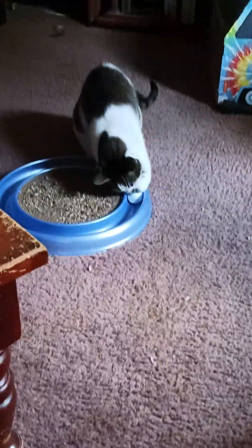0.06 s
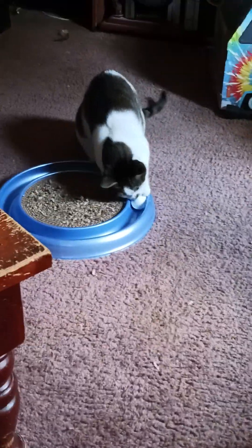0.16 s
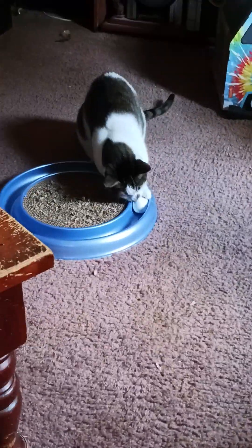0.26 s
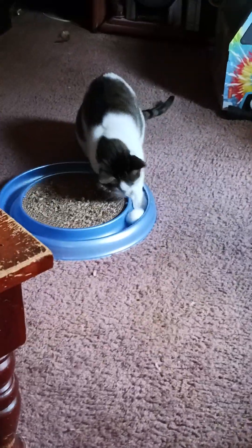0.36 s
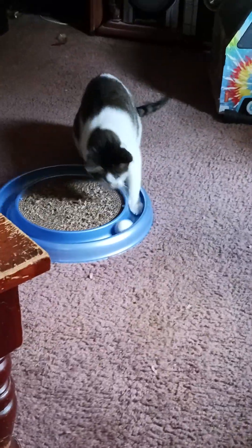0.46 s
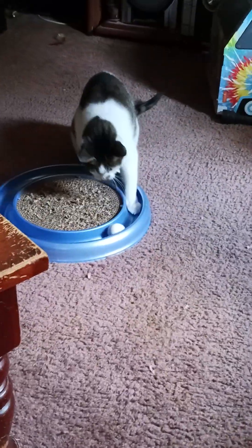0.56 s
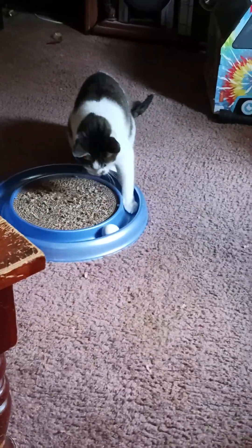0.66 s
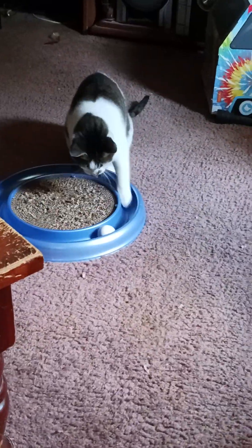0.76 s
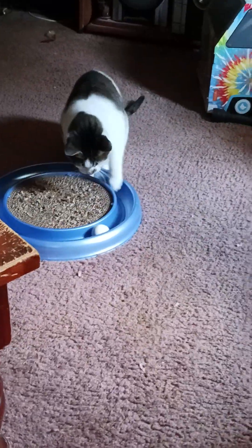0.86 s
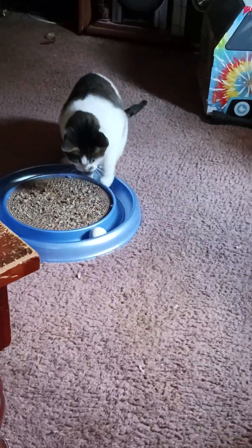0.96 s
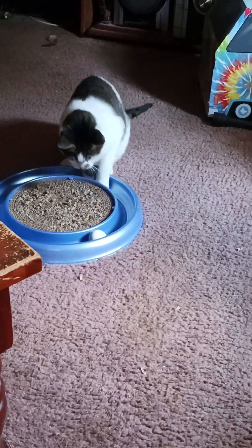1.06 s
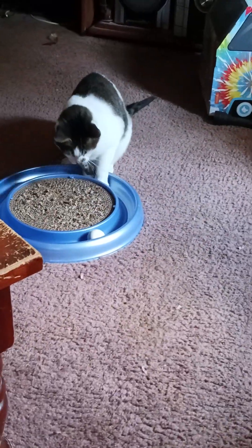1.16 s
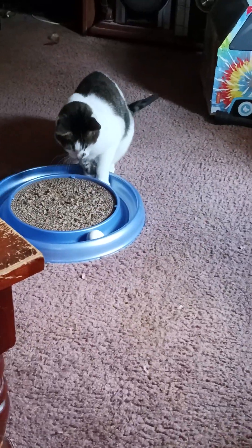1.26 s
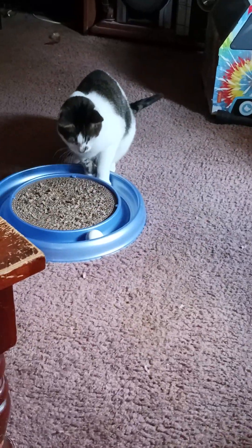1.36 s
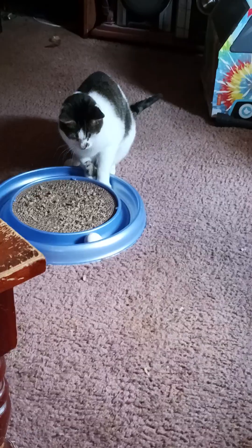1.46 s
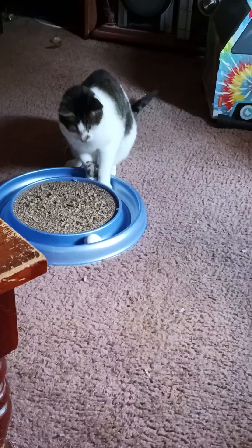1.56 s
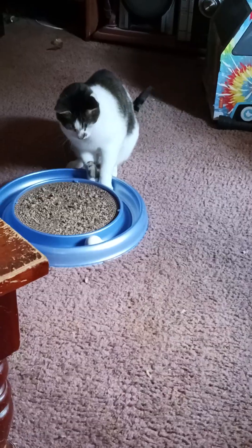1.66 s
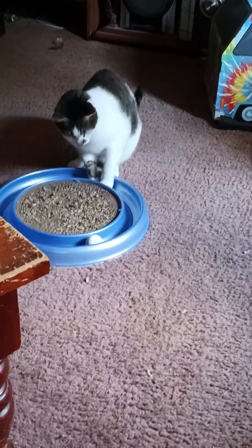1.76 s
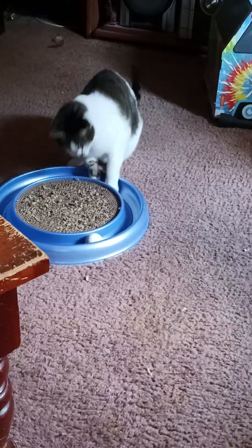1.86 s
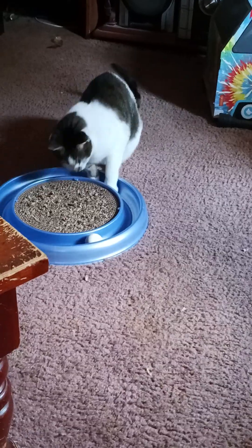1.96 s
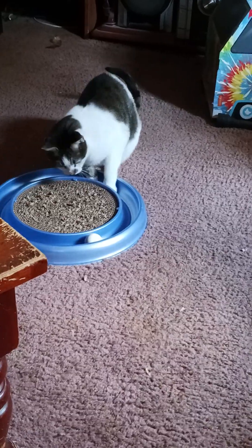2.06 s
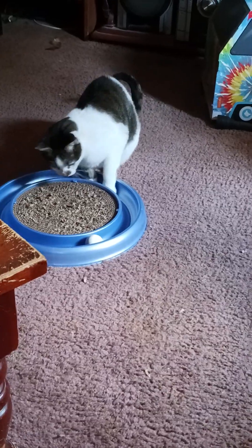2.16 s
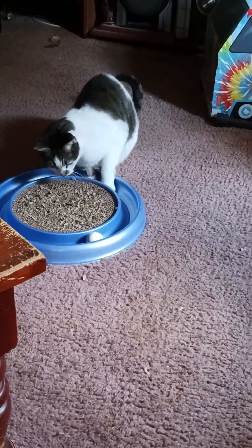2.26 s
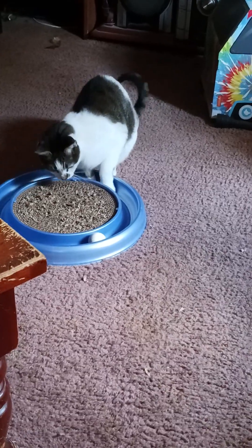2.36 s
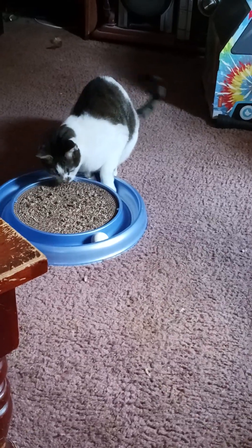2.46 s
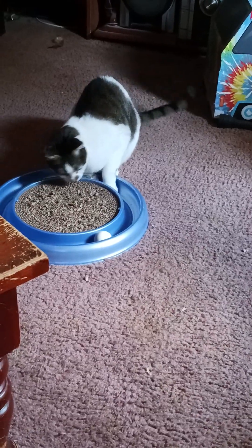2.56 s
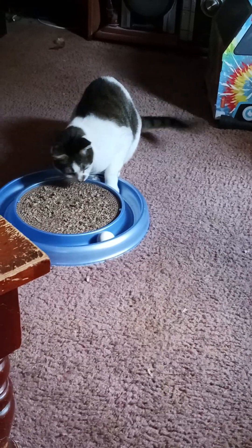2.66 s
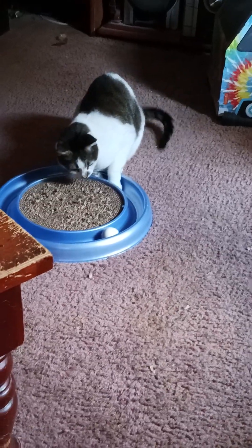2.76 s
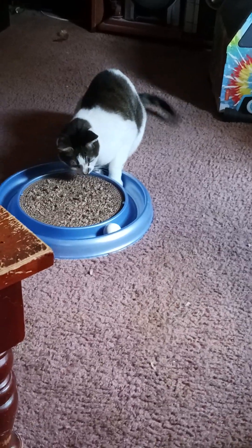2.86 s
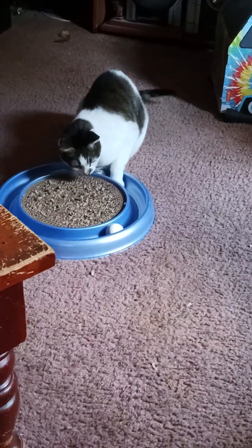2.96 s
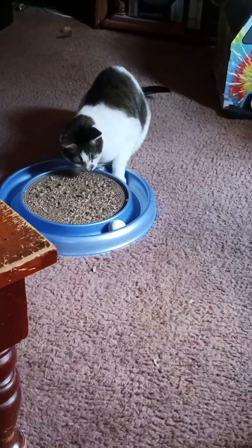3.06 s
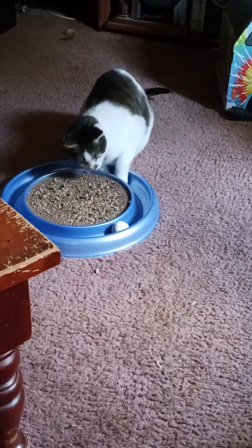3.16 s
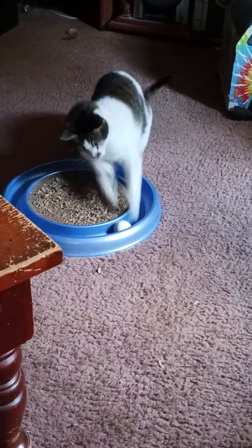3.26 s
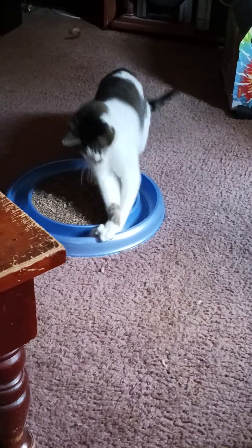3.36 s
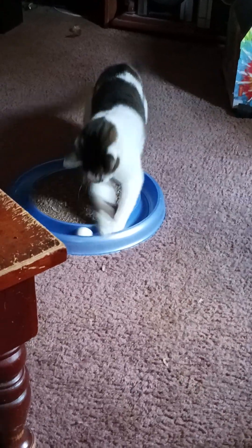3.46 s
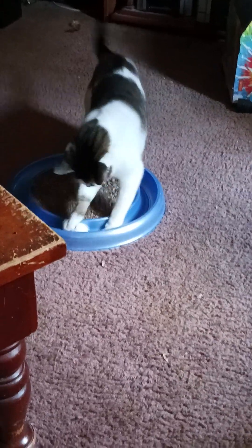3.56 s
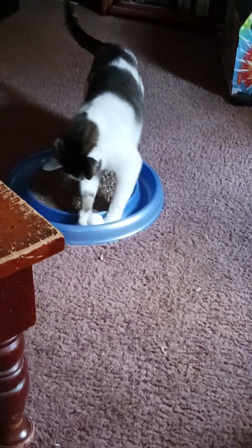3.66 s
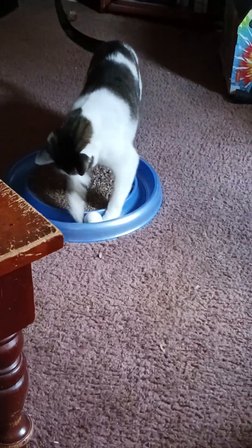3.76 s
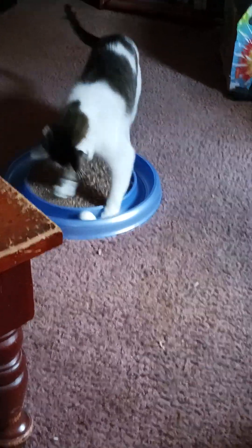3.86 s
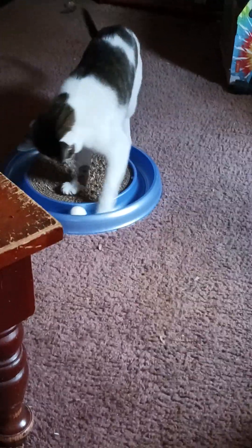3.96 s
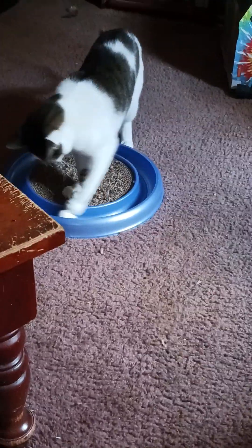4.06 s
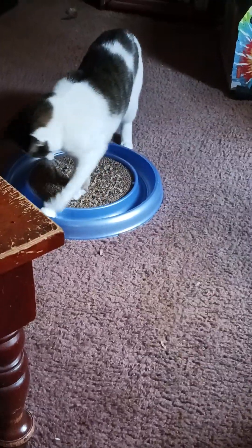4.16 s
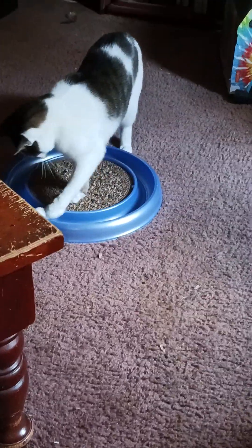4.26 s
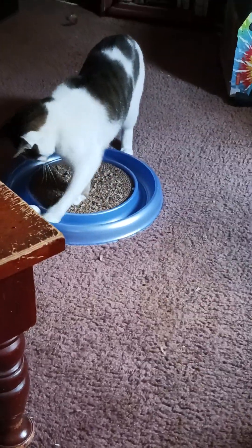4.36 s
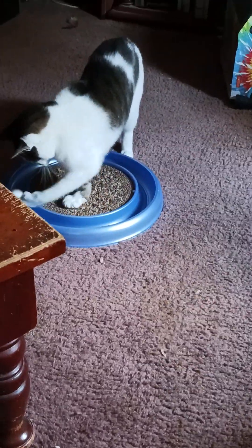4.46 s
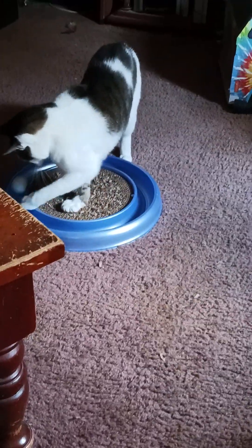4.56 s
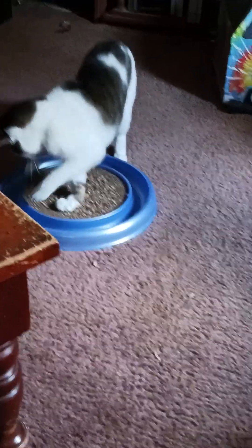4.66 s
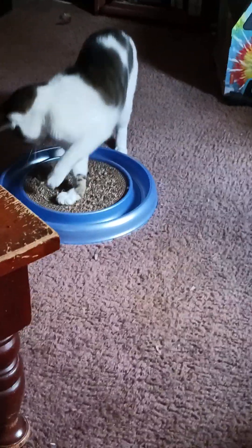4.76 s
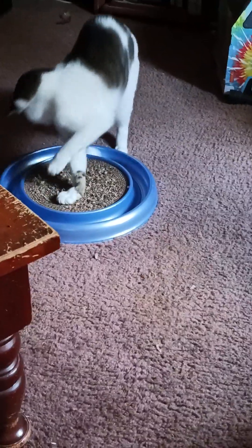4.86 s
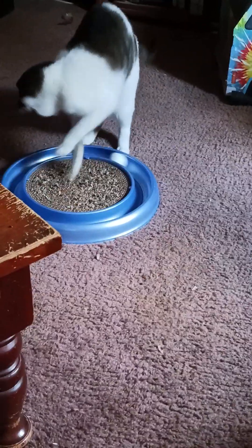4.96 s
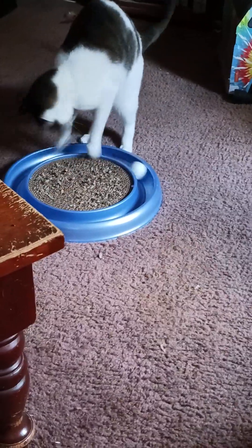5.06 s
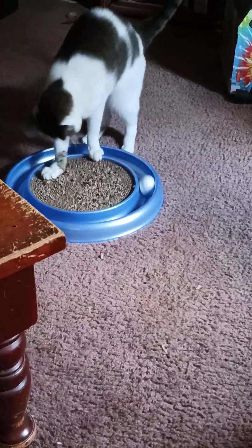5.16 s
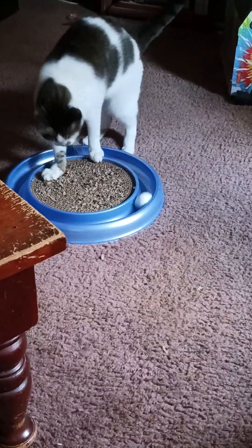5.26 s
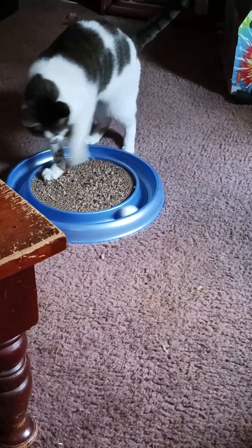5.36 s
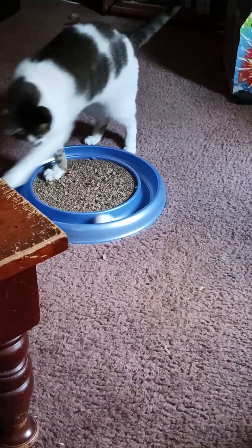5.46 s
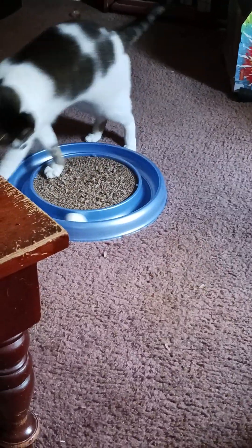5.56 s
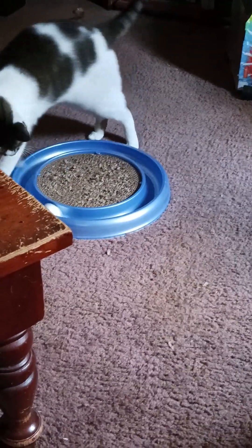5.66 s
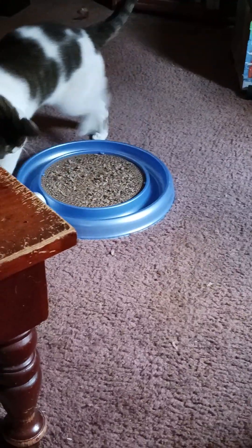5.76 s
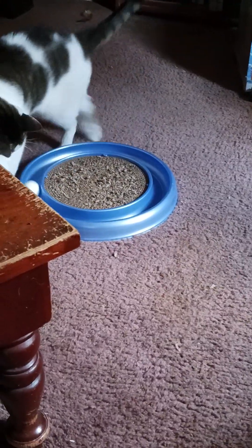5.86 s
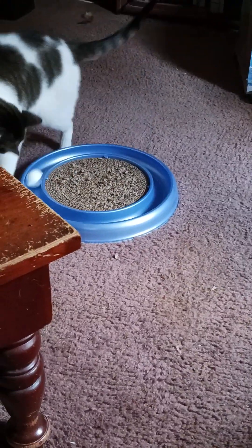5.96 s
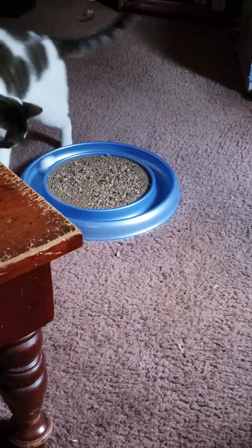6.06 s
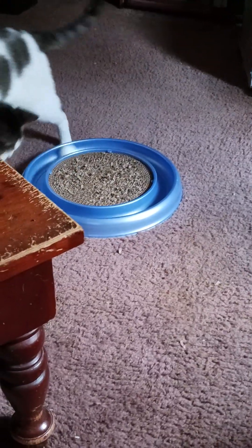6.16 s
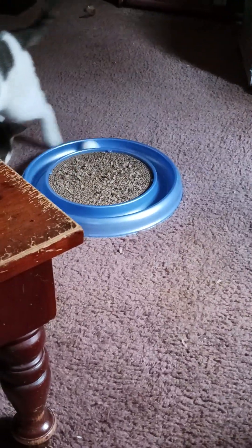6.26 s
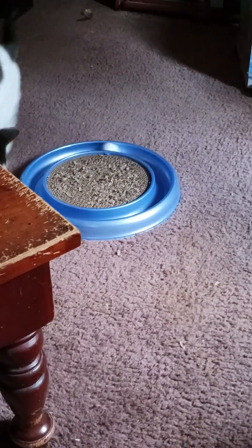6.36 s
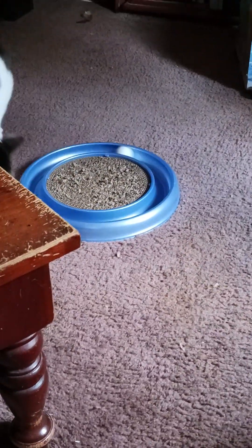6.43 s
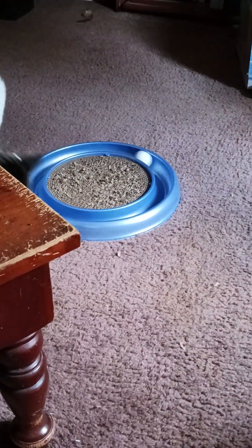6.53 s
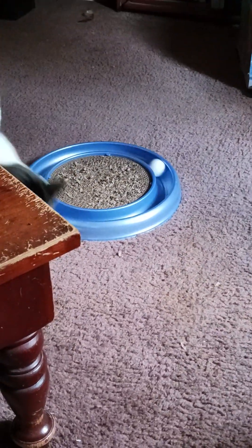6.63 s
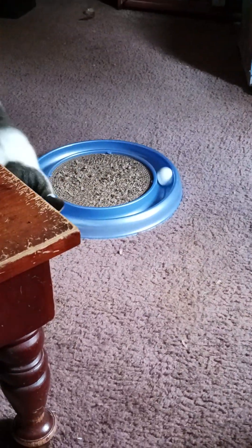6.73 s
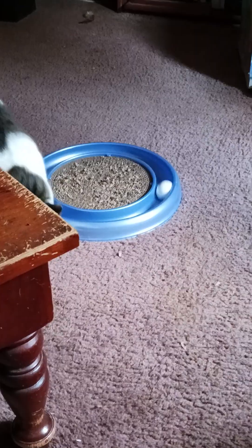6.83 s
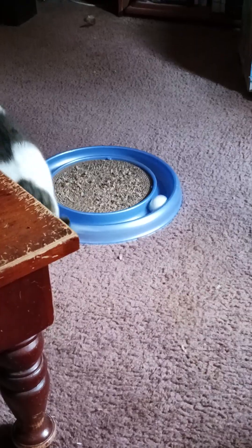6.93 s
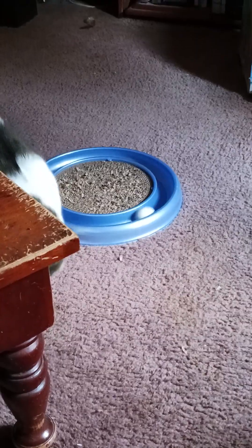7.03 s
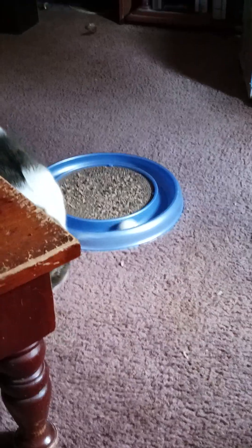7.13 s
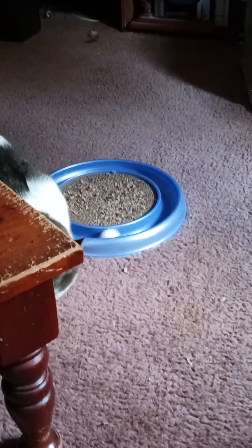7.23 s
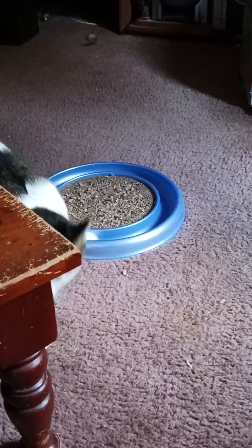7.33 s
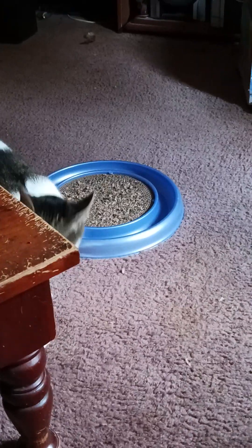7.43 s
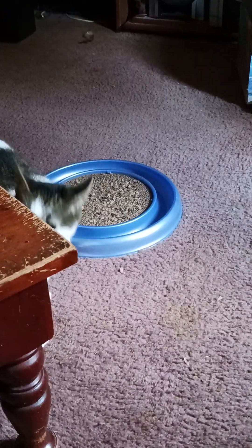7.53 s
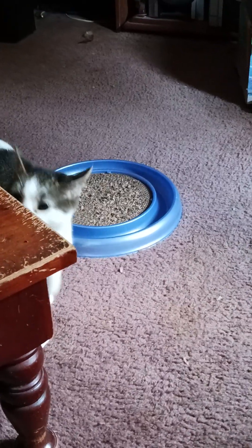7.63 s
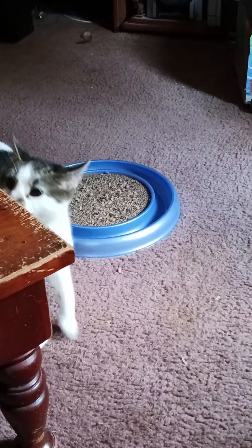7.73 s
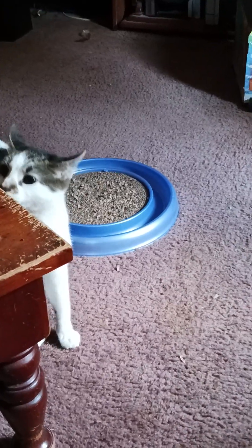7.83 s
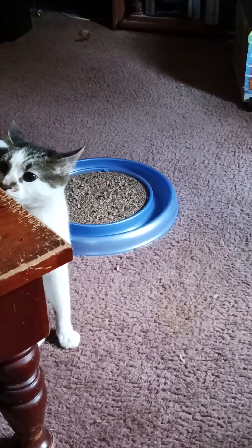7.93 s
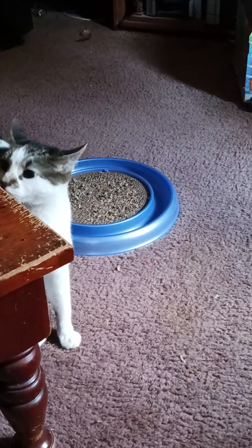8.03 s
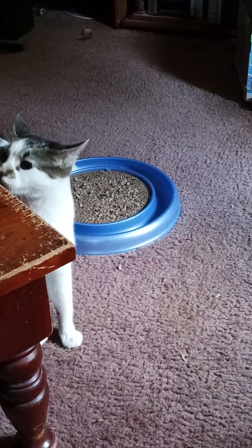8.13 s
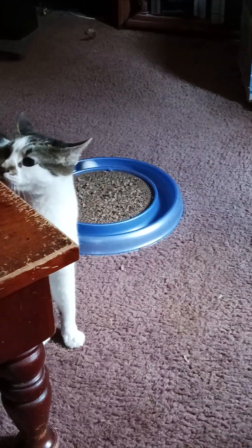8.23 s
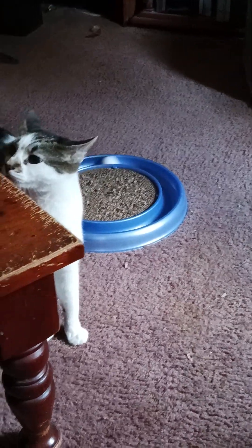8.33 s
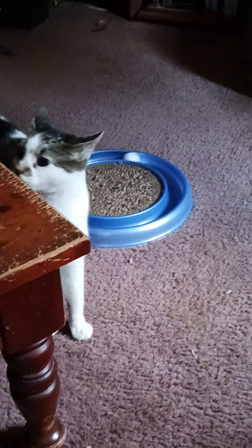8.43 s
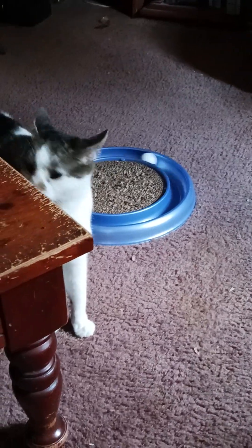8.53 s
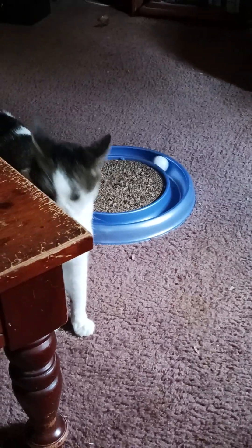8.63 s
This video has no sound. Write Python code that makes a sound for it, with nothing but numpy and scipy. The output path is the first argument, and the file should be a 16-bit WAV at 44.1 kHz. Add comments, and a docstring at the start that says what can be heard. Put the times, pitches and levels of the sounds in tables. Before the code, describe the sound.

A short rasp and a few plastic knocks open, with a little rolling, then room hush and soft hand rumble. Past three seconds come a flurry of slaps, clacks and low bumps, then a hollow rolling ball circles the plastic track, rocking and knocking unevenly as it slows. Thin bright claw clicks dot the roll. Small furnished room, short tail, heard by a handheld stereo phone nearby.

```python
"""Cat batting a ball round a track toy

Paws scrape the cardboard pad and jolt the shell, claws tick, and the ball knocks on its plastic track wall.
Strikes and bumps excite a resonant shell, heard through echoes and a short tail. After a good push the ball
rumbles round, fading and swelling slightly once a lap. Slaps land on the rim and thuds boom in the floor.
A hand shifting on the phone rumbles softly, mostly at the left microphone, over quiet room noise and hum.
"""
import sys
import numpy as np
from scipy import signal
from scipy.fft import rfft, irfft, next_fast_len
from scipy.io import wavfile
from scipy.ndimage import uniform_filter1d

SR = 44100
rng = np.random.default_rng(int(sys.argv[2]) if len(sys.argv) > 2 else 0)


def int16_out(signal):
    """Quantize to a 16-bit WAV file."""
    q = np.round(np.clip(np.atleast_2d(signal).T, -1, 1) * 32767)
    wavfile.write(sys.argv[1], SR, q.astype(np.int16))


N = 383229
SIZE = 8192  # response length, samples
HZ = np.fft.rfftfreq(SIZE, 1 / SR)
TIME = np.arange(N) / SR

# drive of the shell by soft rolling or sliding contact: (frequency [Hz], level [dB])
CONTACT_DRIVE = [(100, 2), (170, 5), (260, 4), (340, -1), (480, -0.5), (700, -2), (1000, -5), (1400, -2.5),
                 (2000, -3), (3000, -9), (4500, -8), (6000, -22), (15000, -25)]
# likeness of diffuse sound at the two microphone ports: (frequency [Hz], coherence [-])
PORT_COHERENCE = [(40, 0.8), (130, 0.91), (290, 0.66), (640, 0.077), (1200, 0), (16000, 0)]


def amp(db):
    """Decibels to gain."""
    return 10 ** (np.asarray(db) / 20)


def unit(x):
    """Scales to an rms of one."""
    return x / np.sqrt(np.mean(x ** 2) + 1e-20)


def unit_onset(response):
    """Scales a response to an rms of one over its first 25 ms."""
    return response / np.sqrt(np.mean(response[:, :SR // 40] ** 2))


def read(points, hz):
    """Interpolates a table on a log-frequency axis."""
    table_hz, value = np.transpose(points)
    return np.interp(np.log(hz + 1), np.log(table_hz), value)


def add(mix, start_s, sound):
    """Adds a sound to the mix from start_s, cut at the end of the mix."""
    part = mix[:, max(round(start_s * SR), 0):][:, :sound.shape[-1]]
    part += sound[..., :part.shape[-1]]


def through(x, response):
    """Convolves, keeping the length of x."""
    return signal.oaconvolve(np.atleast_2d(x), np.atleast_2d(response), axes=1)[:, :x.shape[-1]]


def bump(hz, width_hz):
    """The bell of one resonance, height one."""
    return 1 / (1 + (2 * (HZ - hz) / width_hz) ** 2)


def ring(db):
    """Minimum-phase impulse response with this spectrum: the cepstrum is folded to be causal."""
    floored_db = np.maximum(db, db.max() - 100)
    cepstrum = irfft(np.log(amp(floored_db)))
    cepstrum[1:SIZE // 2] *= 2
    cepstrum[SIZE // 2 + 1:] = 0
    return irfft(np.exp(rfft(cepstrum)))


def smooth_noise(window_s):
    """Random fluctuation slower than the window, rms one."""
    return unit(uniform_filter1d(rng.standard_normal(N), max(int(window_s * SR), 2)))


def grains(per_s, spread_db):
    """Random small impacts of uneven size and either sign."""
    hit = rng.random(N) < per_s / SR
    size = np.minimum(rng.exponential(1, N), 4)
    sign = rng.choice([-1, 1], N)
    return unit(hit * sign * amp(spread_db * size))


def diffuse(size):
    """White noise from all sides: the ports share it at low frequencies and differ in the treble."""
    left, other = rfft(rng.standard_normal((2, size)))
    same = np.clip(read(PORT_COHERENCE, np.fft.rfftfreq(size, 1 / SR)), -1, 1)
    right = same * left + np.sqrt(1 - same ** 2) * other
    return irfft(np.array([left, right]), size)


def room(tail_db):
    """Paths from one spot on the toy: direct sound, a few echoes and a diffuse decaying tail."""
    # nearby furniture and walls: (delay [s], level [dB])
    echo_paths = [(.0026, -11), (.0083, -8), (0.0123, -14.5), (.0201, -14.5)]
    # decay of the tail: (frequency [Hz], time to fall 60 dB [s])
    tail_t60 = [(150, 0.47), (500, 0.31), (1400, 0.3), (3700, .27), (10000, 0.2)]
    left_lead_s, echo_jitter_s, build_s = .00007, .000306, .0064

    def delay(left_s, right_s):
        return np.exp(-2j * np.pi * HZ * np.array([[left_s], [right_s]]))

    start_s = 8 / SR
    paths = delay(start_s, start_s + left_lead_s)
    for delay_s, db in echo_paths:
        paths = paths + amp(db) * delay(*(delay_s + echo_jitter_s * rng.uniform(-1, 1, 2)))
    hz, t, spectra = signal.stft(diffuse(SIZE), SR, nperseg=256)
    decay = amp(-60 * t / read(tail_t60, hz)[:, None])
    build = 1 - np.exp(-t / build_s)
    tail = signal.istft(spectra * decay * build)[1][:, :SIZE]
    return irfft(paths) + amp(tail_db) * unit(tail) / np.sqrt(SIZE)


def shell_db(shift=1):
    """Spectrum of the plastic shell: a broad shape plus resonances, whose pitches scale with shift."""
    # broad shape: (frequency [Hz], level [dB])
    broad_shape = [(60, -20), (140, -8), (210, -8), (300, 0), (500, -2), (680, -0.5), (950, -10),
                   (1300, -3), (1950, -6), (2800, -16), (4600, -16), (8000, -15.5), (13000, -21.5),
                   (16000, -29)]
    # resonances: (frequency [Hz], width [Hz], height above the shape [dB])
    modes = [(258, 26, 9), (338.2, 26, 8), (435, 29, 4), (620, 50, 3), (745, 70, 4), (1200, 70, 3.5),
             (1352, 35, 6), (1627, 56, 3), (1808, 35, 8), (1968, 25, 6), (2164, 30, 4), (2895, 30, 5),
             (3480, 30, 7), (4650, 440, 3)]
    return read(broad_shape, HZ) + sum(db * bump(hz * shift, width) for hz, width, db in modes)


def radiate(db, tail_db):
    """The shell heard across the room; bending waves carry the treble faster than the bass."""
    # tilt of the toy between the ports: (frequency [Hz], left over right [dB])
    side_balance = [(100, 0), (240, -1), (350, -4), (700, 1), (1300, -1.5), (2500, 0), (4500, -3),
                    (8000, 2), (15000, 4)]
    lag_s = .0007 / np.sqrt(1 + HZ / 1500)
    dispersion = np.exp(-2j * np.pi * np.cumsum(lag_s) * HZ[1])
    sides = amp(np.array([[.5], [-.5]]) * read(side_balance, HZ))
    return through(room(tail_db), irfft(rfft(ring(db)) * dispersion * sides))


def hush():
    """Still room: noise shaped at each port, plus a faint steady appliance hum."""
    # room noise: (frequency [Hz], relative level [dB])
    noise_tone = [(15, -54), (25, -23), (59, -2.5), (92, -6.5), (123, 2.5), (161, -8.5), (249, -2.5),
                  (285, -12.5), (405, -11.5), (463, -24.5), (641, -15), (1160, -22), (1740, -18),
                  (2410, -30.5), (16000, -34.5)]
    # tilt of the noise between the ports: (frequency [Hz], left over right [dB])
    noise_balance = [(60, 0), (110, -2.5), (200, 2.5), (380, 1.5), (700, 0), (1290, 3.0), (2380, 5.5),
                     (4400, 1), (8120, 4), (15000, 13)]
    noise_db, hum_hz, hum_peak_db = -65, 119.5, -75
    apart_db = 10 * np.log10(2 / (1 + np.clip(read(PORT_COHERENCE, HZ), 0, 1)))
    sides_db = np.array([[.5], [-.5]]) * read(noise_balance, HZ)
    port_filters = np.array([ring(db) for db in read(noise_tone, HZ) + apart_db + sides_db])
    noise = unit(through(diffuse(next_fast_len(N))[:, :N], port_filters))
    return amp(noise_db) * noise + amp(hum_peak_db) * np.sin(2 * np.pi * hum_hz * TIME)


def laps():
    """Laps run since the far side of the track, at a speed that dies away exponentially."""
    far_side_s, lap_s, slowing_s = 4.87, 1.3, 6  # a pass of the far side, lap time there, time constant
    return slowing_s / lap_s * (1 - np.exp(-(TIME - far_side_s) / slowing_s))


def rolling():
    """Tiny bumps under the ball drive the shell; tone and paths change as it circles, friction fades it."""
    # push to stop by a paw: (start [s], end [s], relative rumble [dB], relative rattle [dB])
    rolls = [(0, .58, -65.5, -72), (3.9, 4.45, -66, -74), (4.45, 8.8, -56, -65.6)]
    spin_up_s, stop_s = .1, .06
    rumble_loss_db_per_s, rattle_loss_db_per_s = 1.5, 2.3
    rumble_trim_db, rattle_trim_db = 1.4, 1.5
    rumble_swell_db, rattle_swell_db = .3, .9  # at the far side of each lap
    rock_period_s, rock_touch_s, rock_db = .272, 6.9, 2.3  # from wall to wall of the groove
    turn, rumble, rattle, heard = laps(), 0, 0, 0
    for start_s, end_s, low_db, high_db in rolls:
        age_s = np.maximum(TIME - start_s, 0)
        moving = (1 - np.exp(-age_s / spin_up_s)) * np.exp(-np.maximum(TIME - end_s, 0) / stop_s)
        rumble = rumble + moving * amp(low_db - rumble_loss_db_per_s * age_s)
        rattle = rattle + moving * amp(high_db - rattle_loss_db_per_s * age_s)
    wobble_db = 2.3 * smooth_noise(.06)
    rocking_db = rock_db * np.cos(2 * np.pi * (TIME - rock_touch_s) / rock_period_s)
    bumps = grains(per_s=340, spread_db=3.8) * amp(wobble_db + rocking_db)
    for spot in (.25, .75):  # crossfade between two spots on the track
        near = abs(np.cos(np.pi * (turn - spot)))
        colour_db = shell_db(1 + .025 * np.sin(2 * np.pi * spot)) + read(CONTACT_DRIVE, HZ)
        heard = heard + through(bumps * near, radiate(colour_db, tail_db=2))
    low = signal.sosfiltfilt(signal.butter(4, 950, fs=SR, output="sos"), heard)
    far = np.cos(2 * np.pi * turn)
    rumble_gain = rumble * amp(rumble_trim_db + rumble_swell_db * far)
    rattle_gain = rattle * amp(rattle_trim_db + rattle_swell_db * far)
    return rumble_gain * unit(low) + rattle_gain * unit(heard - low)


def strikes(rows, reach, tail_db, ping_hz, ping_width_hz):
    """Each strike rings the shell; the harder the contact, the more of the upper bands it reaches."""
    # edges between body, clack, crack and fizz: [Hz]
    band_edges_hz = [900, 2600, 7500]
    pitch_wander, hollow_db, hollow_width_hz = .004, 4, 260
    firm_db, soft_range_db = -43, 6
    softer_db = np.array((-2, -1.5, 0, 0))  # per band, for the lightest touch
    wetter_db, drier_db_per_db = 3.5, 1.6
    out = np.zeros((2, N))
    band = np.searchsorted(band_edges_hz, HZ)
    base_db, slope = np.transpose(reach)
    for start_s, db, hardness_db, hollow_hz, ping_db in rows:
        shape_db = shell_db(1 + pitch_wander * rng.standard_normal())
        shape_db += hollow_db * bump(hollow_hz, hollow_width_hz) + ping_db * bump(ping_hz, ping_width_hz)
        # light touches are softer and heard more by way of the room; the very hardest are dry
        light = np.clip((firm_db - db) / soft_range_db, 0, 1)
        wet_db = tail_db + wetter_db * light - drier_db_per_db * max(hardness_db, 0)
        power = amp(db + base_db + slope * hardness_db + light * softer_db) ** 2
        strength_db = 10 * np.log10(power / np.bincount(band, amp(shape_db) ** 2))
        drive_db = read(list(zip((650, 1400, 4500, 10000), strength_db)), HZ)
        add(out, start_s, np.sqrt(power.sum()) * unit_onset(radiate(shape_db + drive_db, wet_db)))
    return out


def knocks():
    """The ball hits the track wall and rings the shell; once, a dragging paw jolts the shell instead."""
    # ball on the track wall, but at 0.4054 s a paw drags the toy and jolts its shell:
    # (time [s], relative level [dB], hardness as treble over body [dB], hollow pitch of the spot [Hz],
    #  ping of the rim [dB])
    shell_hits = [(0.0352, -49, -19, 440, 0), (0.2346, -62, -3, 580, 5), (0.4054, -49, -12, 440, 10),
                  (0.6266, -69, -5, 480, 1), (3.3841, -45.5, -3, 500, 9), (3.872, -41.5, -12.5, 430, 3),
                  (4.3126, -63, -8, 270, 4), (4.4423, -55, -15, 280, 0), (4.5055, -45.5, -20, 330, 2),
                  (4.6209, -55, -17, 400, 3), (4.7732, -47, -24, 460, 6), (4.8808, -48.5, -27, 420, 8),
                  (4.9075, -38.5, -17.5, 520, 0), (4.9698, -58, -11, 470, 3), (5.0178, -52, -24, 420, 0),
                  (5.1835, -48, -18, 360, 1), (5.2515, -50, -9.5, 340, 0), (5.3929, -49, -23, 530, 0),
                  (5.5107, -50, -26, 390, 4), (5.7814, -53, -16, 390, 0), (5.8394, -63, -5, 320, 10),
                  (5.9218, -48.5, -19, 520, 5), (6.1239, -53, -18, 440, 1), (6.2539, -51, -27, 460, 1),
                  (6.4036, -41.5, -15, 620, 13), (6.4532, -52, -22, 510, 5), (6.5648, -52, -22, 440, 1),
                  (6.6905, -53, -21, 460, 1), (7.4258, -50, -28, 510, 2), (7.7999, -54, -18, 490, 0),
                  (7.8124, -48, -20, 380, 0), (8.4086, -44.5, -16.5, 510, 3)]
    # body, clack, crack, fizz: (level at hardness zero [dB], gain per hardness [dB/dB])
    band_reach = [(0, 0), (-1, .35), (-1.5, .98), (-6, .72)]
    return strikes(shell_hits, band_reach, tail_db=-2.3, ping_hz=4550, ping_width_hz=1100)


def held(start_s, end_s, rise_s, fall_s):
    """Swells up to the start, holds, and dies away after the end."""
    return np.exp(np.minimum(TIME - start_s, 0) / rise_s - np.maximum(TIME - end_s, 0) / fall_s)


def grip():
    """Slow lumpy pressure of the hand on the phone, mostly in the left port."""
    # shifts of the hand: (start [s], length [s], relative level [dB])
    hand_shifts = [(.04, .1, -51), (.28, .14, -51), (.74, .27, -55), (1.36, .06, -62), (1.61, .11, -51),
                   (1.8, .04, -57), (2.87, .04, -52), (2.98, .15, -60), (3.29, .04, -46), (3.375, .04, -37),
                   (3.53, .22, -50), (3.92, .32, -52.5), (4.32, .14, -43.5), (4.79, .2, -46),
                   (5.14, .17, -41.5), (5.43, .23, -52), (5.7, .04, -47), (6.86, .18, -61),
                   (7.63, .06, -46), (7.94, .39, -58), (8.655, .05, -44.5)]
    # tone of the pressure noise: (frequency [Hz], level [dB])
    pressure_tone = [(15, -35), (25, -21), (40, -1), (60, 0.5), (85, -3), (120, -13), (170, -21),
                     (250, -29), (480, -60), (2000, -90)]
    holding_db = -75  # faint pressure between shifts, before the port gains
    left_db, right_db, evenness = 5, -17, .59
    power = amp(holding_db) ** 2
    for start_s, length_s, db in hand_shifts:
        power = power + (amp(db) * held(start_s, start_s + length_s, rise_s=.014, fall_s=.036)) ** 2
    lumps = through(rng.standard_normal((2, N)), ring(read(pressure_tone, HZ)))
    envelope = abs(uniform_filter1d(abs(lumps), size=1800))
    lumps = unit(lumps / envelope ** evenness)
    return amp([[left_db], [right_db]]) * lumps * np.sqrt(power)


def ticks():
    """Claws catch: thin bright clicks in the room, and one dry tick right at the right port."""
    # claws catch: (time [s], level [dB])
    catches = [(0.1995, -75), (4.8207, -74), (5.1235, -64), (5.6309, -72), (6.222, -67), (6.643, -74),
               (6.9422, -67), (7.3585, -77), (7.7837, -65), (8.2531, -67.5), (8.5131, -71)]
    # spectrum of a claw: (frequency [Hz], level [dB])
    claw_tone = [(500, -30), (3000, -16), (6000, -4), (9000, 1), (13000, -2), (16000, -5.5)]
    near_s, near_left_db, near_right_db = 3.8082, -68, -57
    out, claw = np.zeros((2, N)), ring(read(claw_tone, HZ))
    for start_s, db in catches:
        add(out, start_s, amp(db) * unit_onset(through(room(tail_db=0), claw)))
    near = ring(read([(1500, -35), (3800, -6), (4800, -10), (6000, 2), (10000, -13), (16000, -13)], HZ))
    add(out, near_s, amp([[near_left_db], [near_right_db]]) * unit_onset(near[None]))
    return out


def scrapes():
    """Fibres snap in clumps and slips shake the shell under paws and body; one stroke is a swell of rolling."""
    # paws and body drag, but at 4.17 s the rolling ball's rumble in the shell swells briefly:
    # (time of the height [s], fall by 20 dB [s], relative fibre rasp [dB], relative shell groan [dB])
    strokes = [(.342, .05, -43.5, -63), (.385, .08, -60, -51), (.422, .08, -53, -52),
               (.517, .04, -50.5, -63), (3.355, .1, -64, -68), (3.39, .19, -53, -55), (3.66, .03, -66, -65),
               (4.17, .06, -82, -59), (4.5, .3, -61, -54.5), (4.83, .15, -72, -50),
               (4.968, .07, -54.5, -62), (5.19, .3, -64, -56), (5.73, .3, -71, -54), (7.48, .4, -85, -61),
               (7.82, .06, -65, -58)]
    # cardboard fibres: (frequency [Hz], level [dB])
    fibre_tone = [(300, -16), (1800, -9), (3000, -14), (4000, -9), (4900, 3.5), (6300, -2), (9000, -2),
                  (13500, -1.5), (16000, -4)]
    rise_s, tail_db, left_rasp_db, right_rasp_db = .02, -1, -2, -4.5
    fibre_power = shell_power = 0
    for peak_s, fall_s, fibre_db, groan_db in strokes:
        rise = np.exp(-2 * ((TIME - peak_s) / rise_s) ** 2)
        fall = .01 ** (abs(TIME - peak_s) / fall_s)
        stroke = np.where(TIME < peak_s, rise, fall)
        fibre_power = fibre_power + amp(fibre_db) ** 2 * stroke
        shell_power = shell_power + amp(groan_db) ** 2 * stroke
    clumps = amp(3 * smooth_noise(.008))
    pad = through(room(tail_db), ring(read(fibre_tone, HZ)))
    body = radiate(shell_db() + read(CONTACT_DRIVE, HZ), tail_db)
    snaps = unit(grains(per_s=1800, spread_db=3) * clumps) * np.sqrt(fibre_power)
    slips = grains(per_s=900, spread_db=3) * np.sqrt(shell_power)
    rasp = amp([[left_rasp_db], [right_rasp_db]]) * through(snaps, pad / np.linalg.norm(pad[0]))
    groan = through(slips, body / np.linalg.norm(body[0]))
    return rasp + groan


def slaps():
    """A paw slaps the rim, claws out, and rings the shell."""
    # (time [s], relative level [dB], hardness as treble over body [dB], hollow pitch of the spot [Hz],
    #  ping of the rim [dB])
    rim_hits = [(3.3309, -58, 8, 300, 19), (3.3621, -50.5, -21, 390, 4), (3.5669, -55.5, -7, 500, 9),
                (3.6142, -60, -10, 420, 6), (3.6726, -39.5, -4.5, 600, 4), (3.6747, -44, -8, 520, 3),
                (4.4815, -46, -10.5, 470, 6)]
    # body, clack, crack, fizz: (level at hardness zero [dB], gain per hardness [dB/dB])
    band_reach = [(0, 0), (3, .4), (-1.5, .98), (-8, .65)]
    return strikes(rim_hits, band_reach, tail_db=-1.5, ping_hz=5100, ping_width_hz=1300)


def thuds():
    """Toy and cat's weight land on the floor: short, low decaying sines."""
    # (time [s], frequency [Hz], relative level [dB], time to fall 60 dB [s])
    landings = [(3.37, 95, -53, .3), (3.675, 62, -43.5, 0.32), (3.915, 66, -48.5, 0.29),
                (5.14, 100, -53, .3), (8.65, 75, -52, .25)]
    rise_s = .012
    out, t = np.zeros((2, N)), np.arange(SIZE) / SR
    for start_s, hz, db, t60_s in landings:
        envelope = np.exp(-np.log(1000) * t / t60_s) * (1 - np.exp(-t / rise_s))
        add(out, start_s, 2 * amp(db) * envelope * np.sin(2 * np.pi * hz * t))
    return out


def scene():
    """Room, toy, hand and cat together."""
    return hush() + rolling() + knocks() + grip() + ticks() + scrapes() + slaps() + thuds()


def record(dry):
    """The phone's band limit: a steep low-pass at 15950 Hz."""
    lowpass = signal.firwin(511, 15950, window=("kaiser", 9), fs=SR)
    return signal.oaconvolve(dry, lowpass[None], "same")


dry = scene()
out = record(dry)
int16_out(out)
```